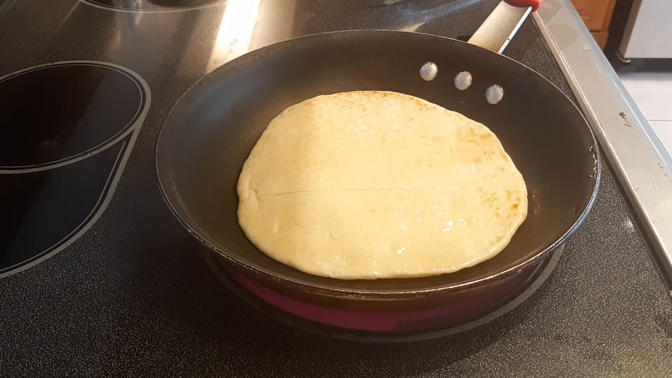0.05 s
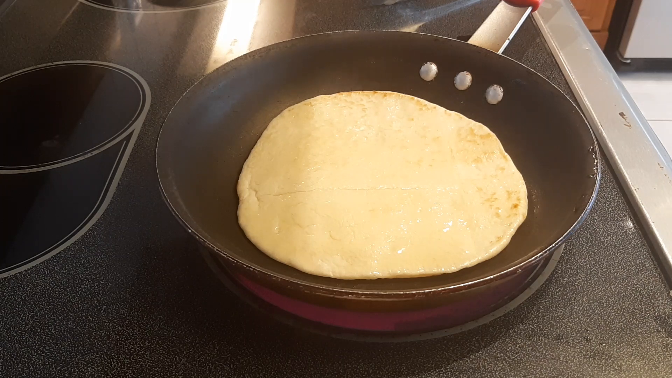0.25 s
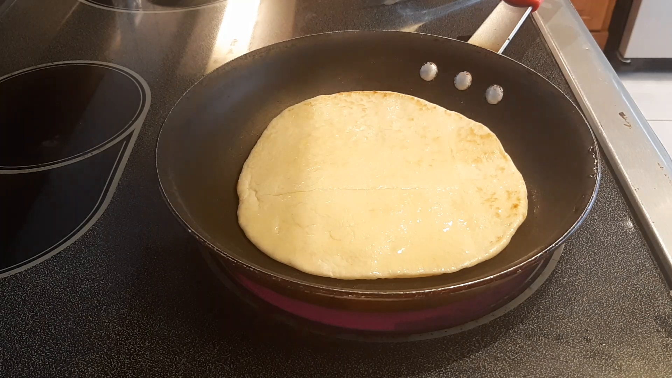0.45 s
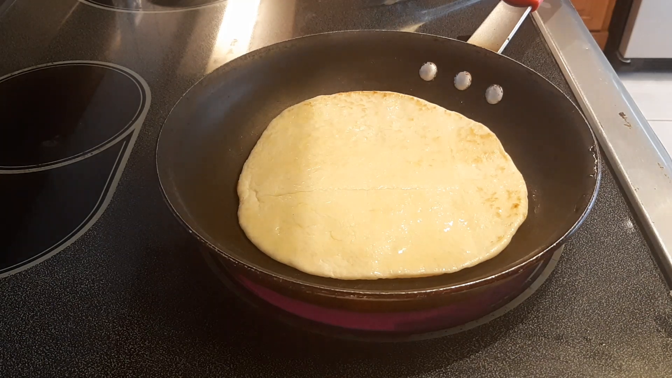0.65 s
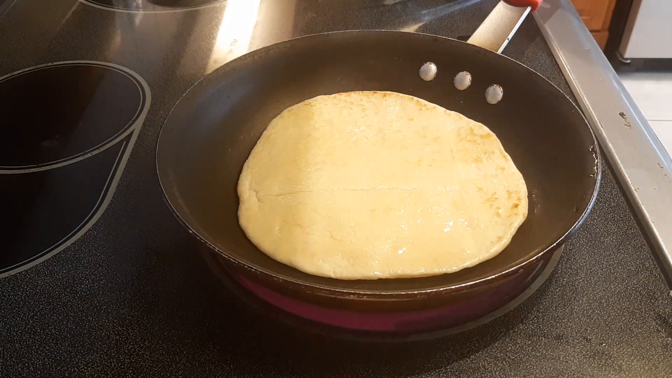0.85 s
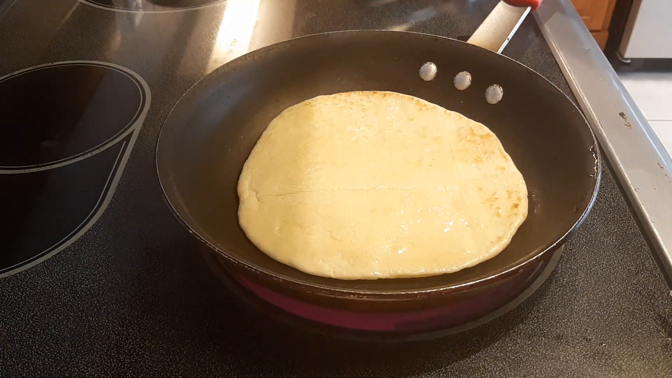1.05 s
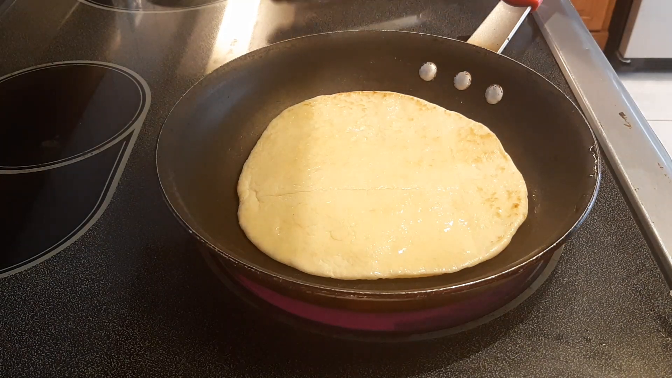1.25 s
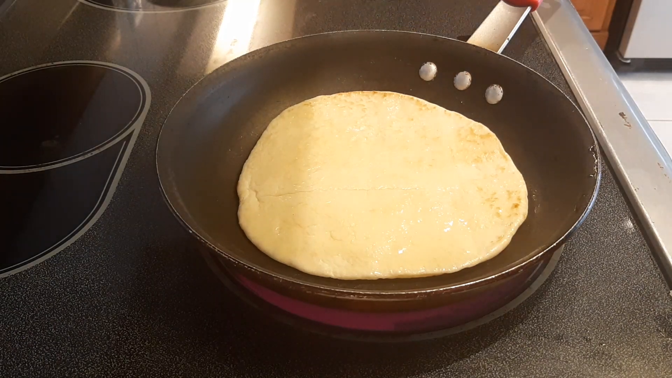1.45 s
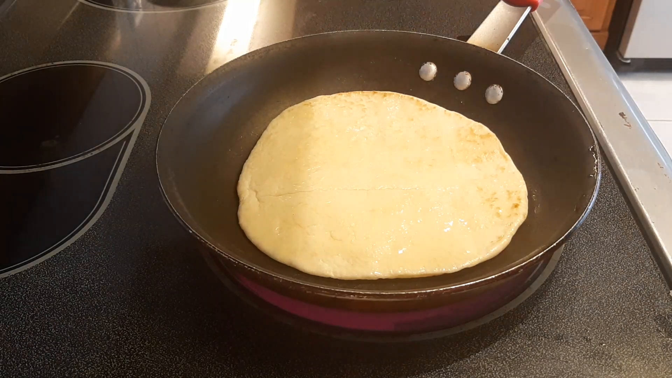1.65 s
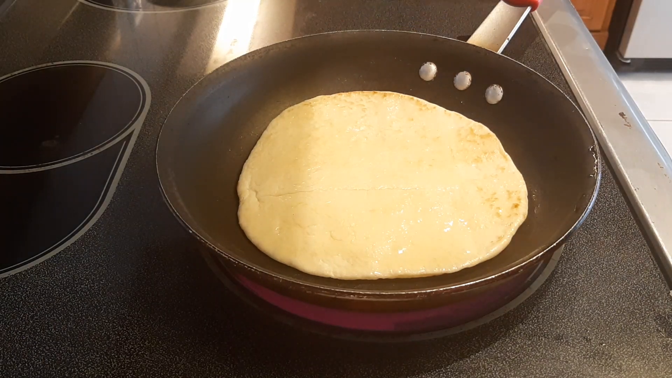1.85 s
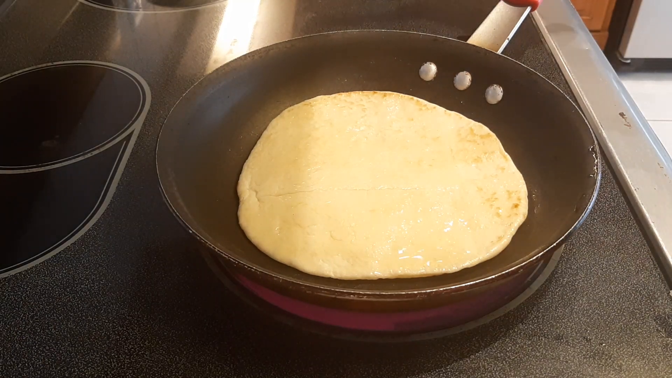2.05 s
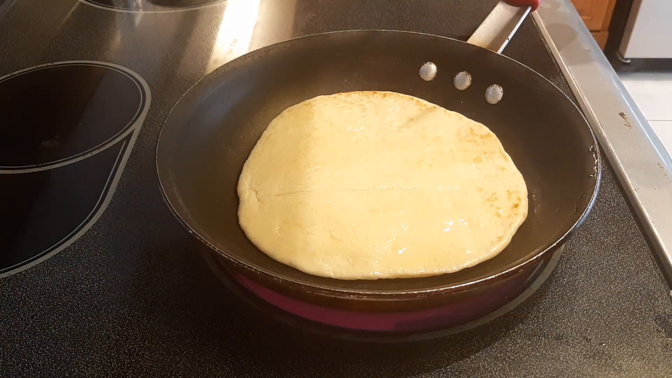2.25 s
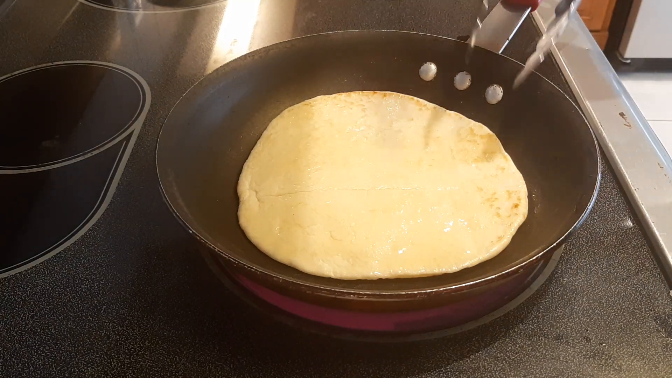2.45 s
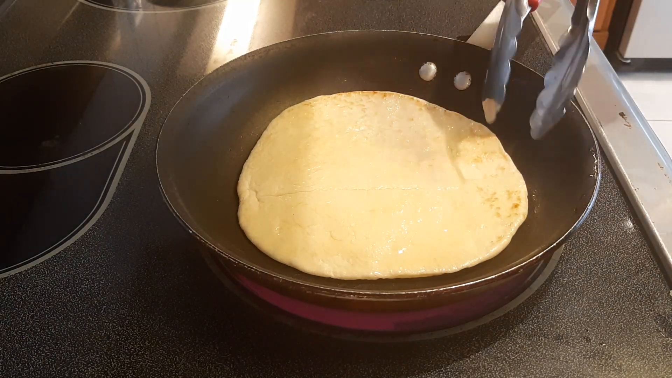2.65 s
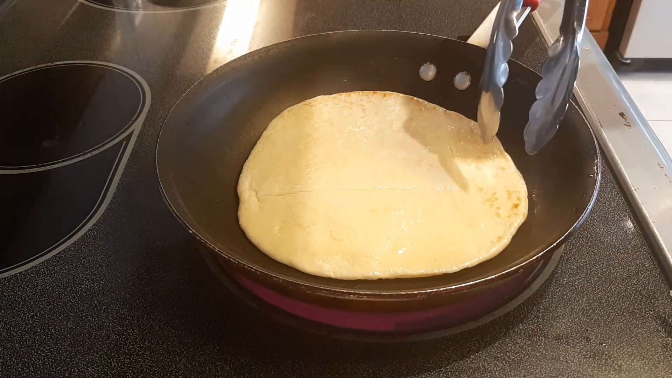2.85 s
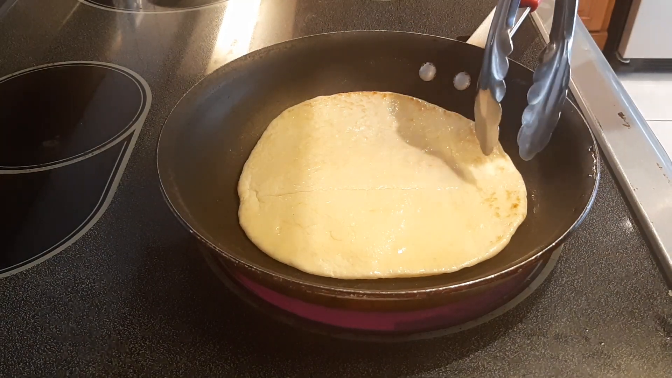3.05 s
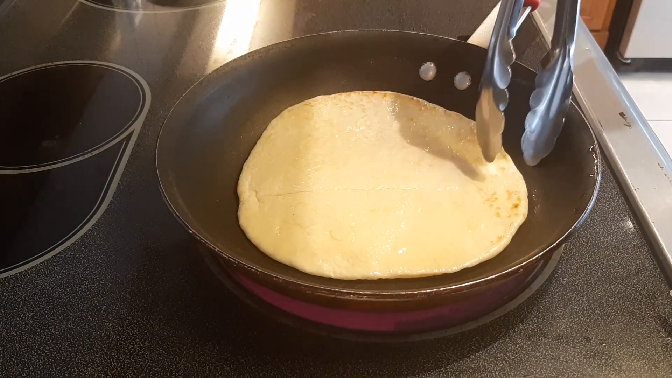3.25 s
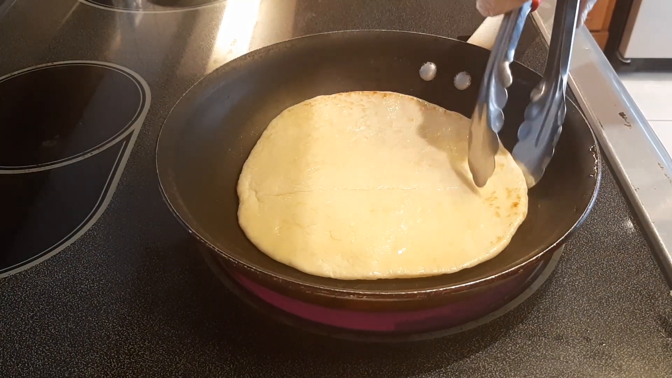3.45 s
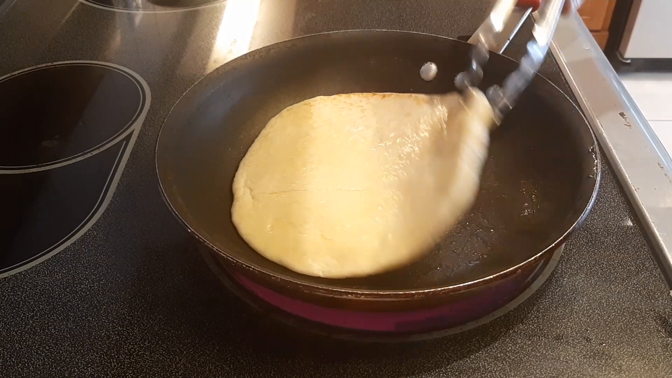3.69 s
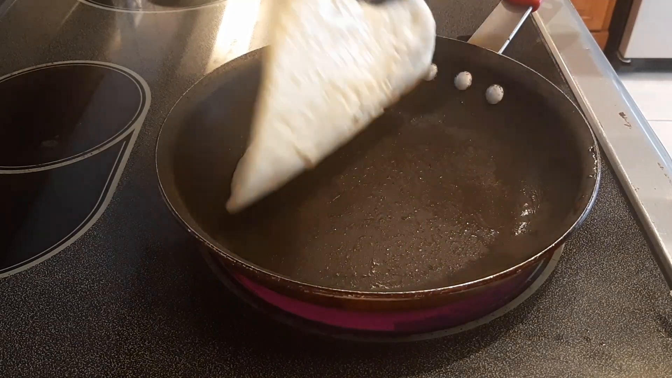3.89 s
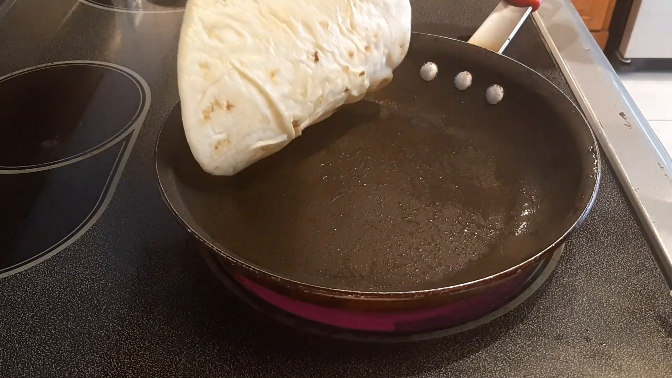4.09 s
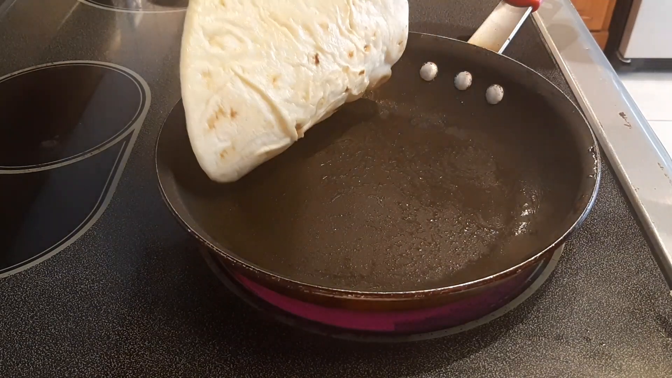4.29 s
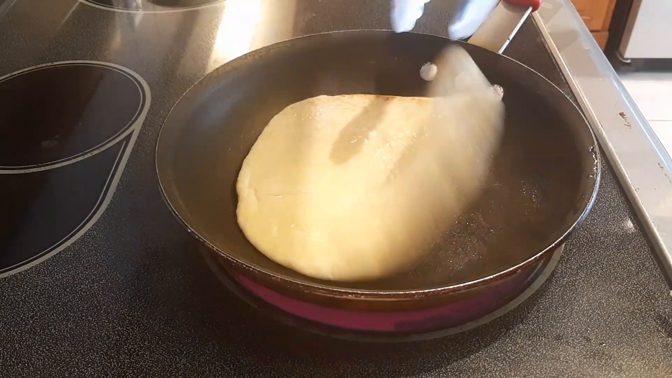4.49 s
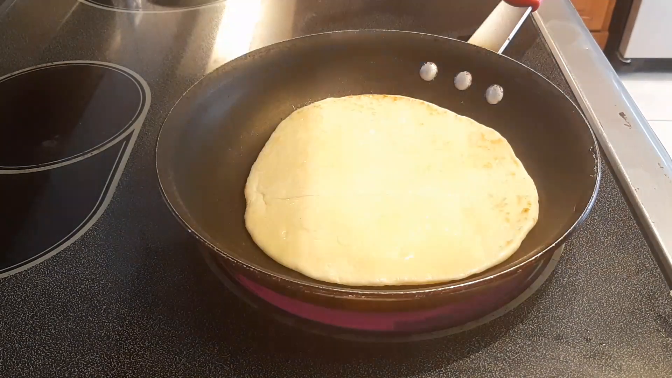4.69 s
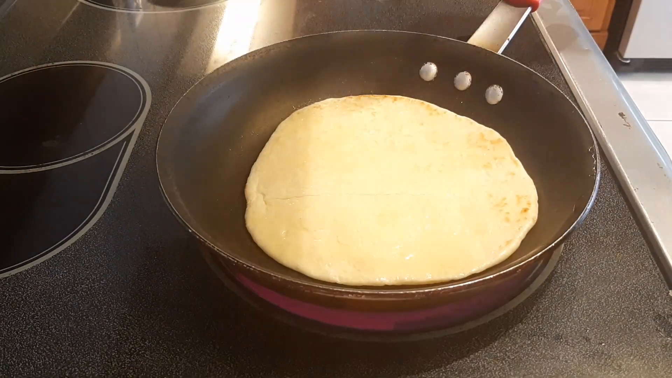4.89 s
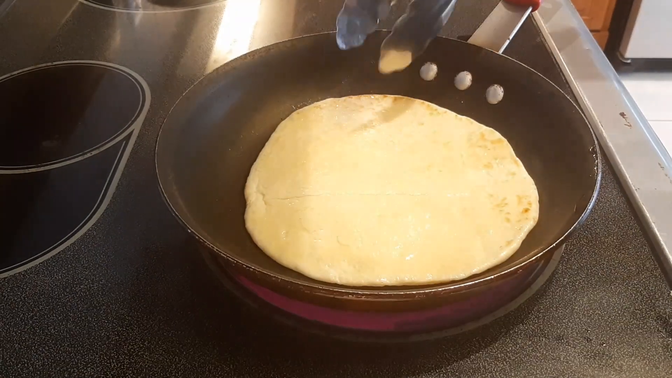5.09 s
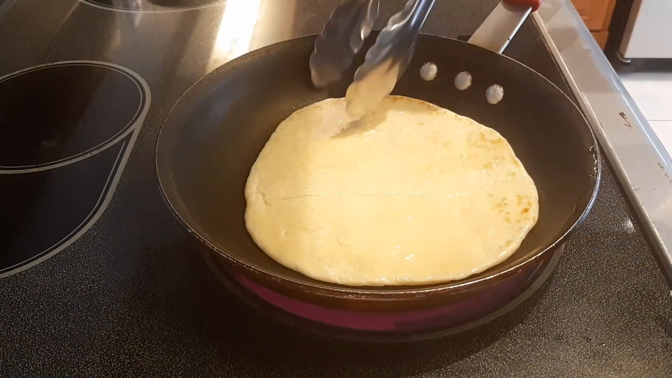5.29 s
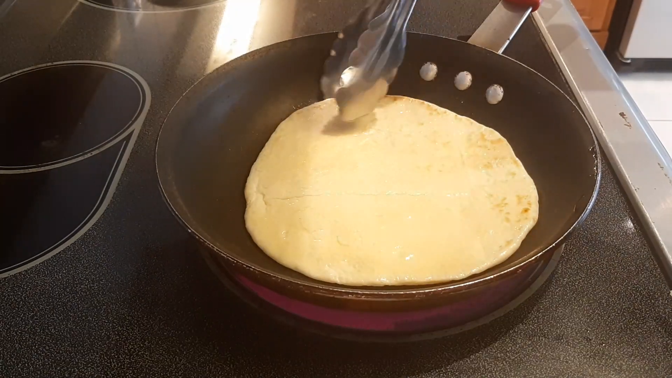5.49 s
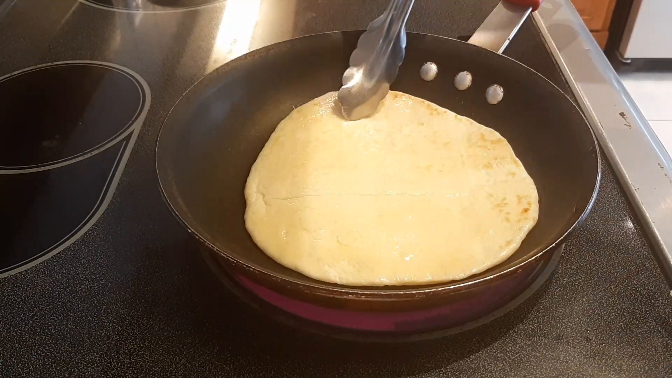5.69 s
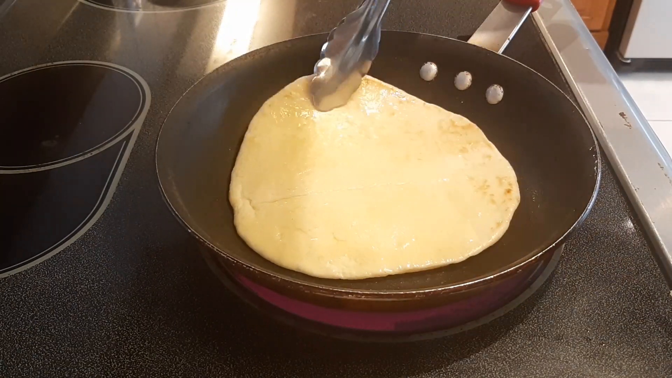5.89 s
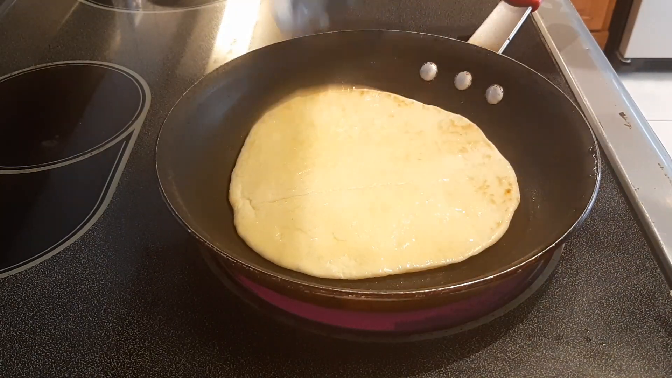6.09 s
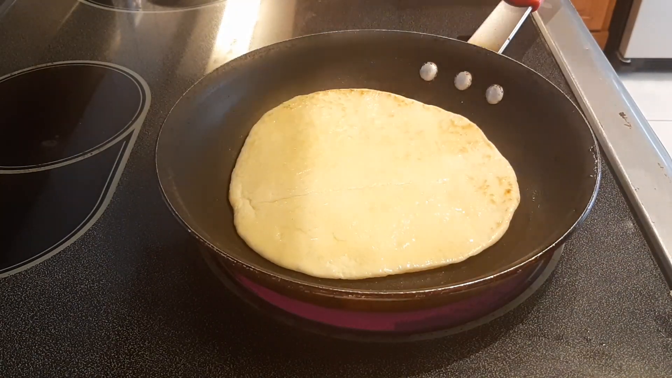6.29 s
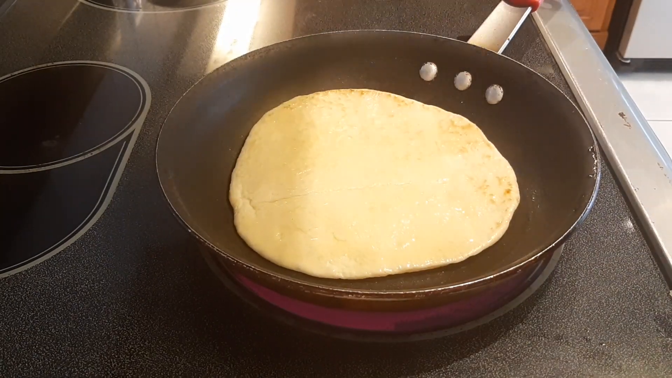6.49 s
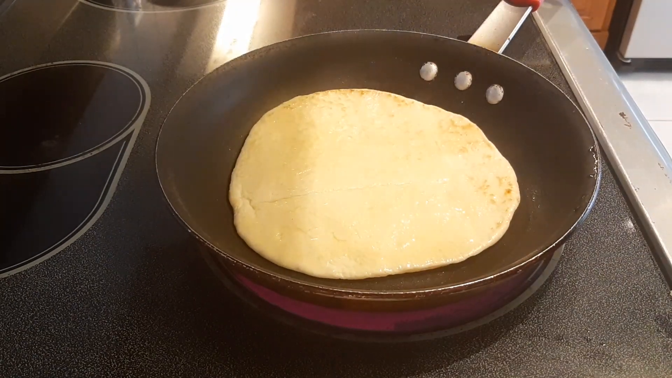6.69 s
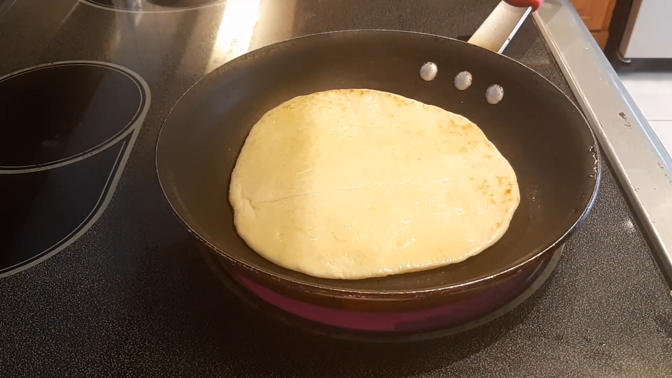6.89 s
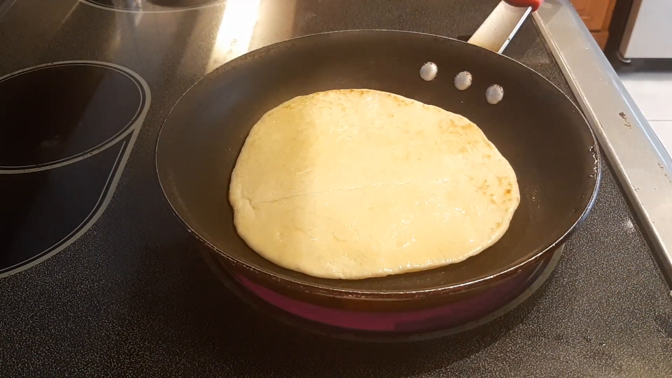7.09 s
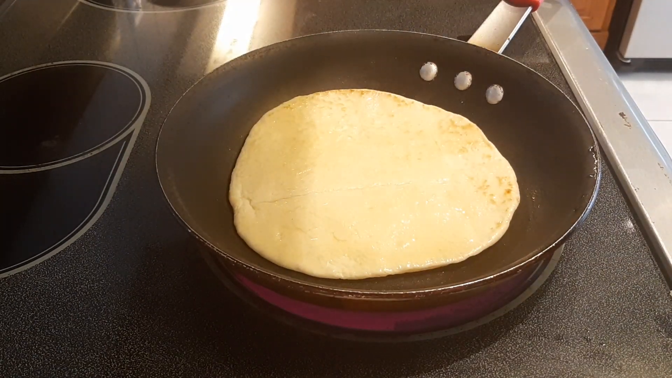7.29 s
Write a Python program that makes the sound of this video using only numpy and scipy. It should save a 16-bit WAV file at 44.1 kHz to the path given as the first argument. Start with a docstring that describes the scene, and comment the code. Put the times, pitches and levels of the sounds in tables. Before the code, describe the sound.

Soft cloth rustle, steel tongs clattering and clicking, a flat dough slap in a pan, then a hard metallic clack in a quiet kitchen.

```python
"""First heard are a low fridge hum and a faint sizzle, with the rub of hand and cloth swelling over them.
Steel kitchen tongs then knock and tick close to a phone; a flatbread slaps into a coated pan.
Hum is a sum of sines, sizzle and friction are filtered noise with uneven envelopes, and impacts
are short noise bursts exciting decaying modes; a small hard kitchen answers the impacts."""
import sys
import numpy as np
from scipy import signal
from scipy.fft import rfft, irfft
from scipy.io import wavfile
from scipy.ndimage import uniform_filter1d

SR = 44100
rng = np.random.default_rng(int(sys.argv[2]) if len(sys.argv) > 2 else 0)


def generate_wav(sig):
    """Save sig (samples, or channels by samples) to the path in sys.argv[1] as 16-bit PCM at SR."""
    pcm = np.round(np.clip(np.atleast_2d(sig).T, -1, 1) * 32767).astype(np.int16)
    wavfile.write(sys.argv[1], SR, pcm)


N = 323694
TIME = np.arange(N) / SR
BLOW = SR // 4  # samples in one impact


def undb(db):
    """Decibel definition: amplitude gain of a level in dB."""
    return 10 ** (np.asarray(db) / 20)


def level(x, db):
    """Root-mean-square scaling: brings a signal to an rms level in dB."""
    return x * undb(db) / np.sqrt(np.mean(x ** 2))


def peak1(x):
    """Peak normalisation: scales a signal to a largest magnitude of one."""
    return x / np.max(np.abs(x))


def sides(pan_db):
    """Level difference: shares left minus right dB equally between the two ports."""
    return np.array([[pan_db], [-pan_db]]) / 2


def read(table, size):
    """Logarithmic frequency scale: interpolates a (Hz, value) table at the bins of a transform."""
    hz, value = np.transpose(table)
    return np.interp(np.log(np.fft.rfftfreq(size, 1 / SR) + 1), np.log(hz), value)


def colour(x, table):
    """Minimum phase: a causal filter with the tabled gain, made by folding the cepstrum."""
    size = 2048
    cepstrum = irfft(read(table, size) * np.log(10) / 20)
    cepstrum[1:size // 2] *= 2
    cepstrum[size // 2 + 1:] = 0
    taps = irfft(np.exp(rfft(cepstrum)))
    taps = taps.reshape((1,) * (x.ndim - 1) + (-1,))
    return signal.oaconvolve(x, taps, axes=-1)[..., :x.shape[-1]]


def band(x, lo_hz, hi_hz):
    """Band limitation: a Butterworth band-pass."""
    return signal.sosfilt(signal.butter(2, [lo_hz, hi_hz], "band", fs=SR, output="sos"), x)


def highpass(x, order, hz):
    """Low-frequency roll-off: a Butterworth high-pass."""
    return signal.sosfilt(signal.butter(order, hz, "high", fs=SR, output="sos"), x)


def walk(rate):
    """Slow random fluctuation: levels held 1 / rate s, then smoothed twice; spread near 1."""
    hold = int(SR / rate)
    steps = np.repeat(rng.standard_normal(N // hold + 1), hold)
    return 1.3 * uniform_filter1d(uniform_filter1d(steps, hold), hold)[:N]


def grain(rough_db, rate):
    """Amplitude modulation: noise unrelated left and right under one shared uneven envelope."""
    return rng.standard_normal((2, N)) * undb(rough_db * walk(rate))


def late(lag_ms, size):
    """Propagation delay as linear phase: half a millisecond, plus the lag of left behind right."""
    delay_ms = (1 + np.array([[lag_ms], [-lag_ms]])) / 2
    return np.exp(-2j * np.pi * np.fft.rfftfreq(size, 1 / SR) * delay_ms / 1000)


def rattle(ms, rise_ms=0.9, lag_ms=0., shared=0.35):
    """Contact excitation: a decaying noise burst, partly alike at the two ports."""
    t = np.arange(BLOW) / SR
    rise = 1 - np.exp(-(t * 1000 / rise_ms) ** 2)
    shape = np.exp(-t / (ms / 1000)) * rise
    push = rfft(shape * rng.standard_normal((3, BLOW)))
    both = np.sqrt(shared) * push[0] + np.sqrt(1 - shared) * push[1:]
    return irfft(both * late(lag_ms, BLOW), BLOW)


def touch_at(lag_ms):
    """Impulse excitation: a single click reaching each port at its own moment."""
    return irfft(late(lag_ms, BLOW), BLOW)


def ring(push, modes):
    """Modal superposition: decaying sines whose phase and level vary with blow and port."""
    t = np.arange(BLOW) / SR
    hz, db, t60 = np.transpose(modes)[:, :, None]
    phase, uneven = rng.standard_normal((2, 2, len(modes), 1))
    swing = np.sin(2 * np.pi * hz * t + phase / 2) * np.exp(-np.log(1000) * t / t60)
    body = np.sum(undb(db + 2.0 * uneven) * swing, axis=1)
    return peak1(signal.fftconvolve(push, body, axes=1)[:, :BLOW])


def add(out, s, sound, db, pan_db):
    """Linear superposition: adds a sound at its time, level and side."""
    i = int(s * SR)
    out[:, i:i + sound.shape[1]] += (sound * undb(db + sides(pan_db)))[:, :N - i]


# air and fridge rumble: (frequency [Hz], relative gain [dB])
RUMBLE_SPECTRUM = [(18, -27.5), (30, -13.5), (70, -12), (118, -5.5), (141, -0.5), (183, -13.5), (239, -4.5),
                   (289, -16), (345, -10), (390, -8), (449, -16.5), (661, -23), (802, -30), (1680, -33.5),
                   (2000, -24), (2600, -63.5), (4400, -120)]
RUMBLE_DB, MAINS_HZ = -60, 60
# mains multiples 2, 4 and 5: (level [dB rms], left minus right [dB])
MAINS_LINES = [(-65.5, 3.5), (-63, -5.5), (-74, -1)]
# fridge motor: (frequency [Hz], level [dB rms], left minus right [dB])
MOTOR_LINE = (397, -73.5, -7)
# likeness of the ports in the rumble: (frequency [Hz], correlation [-], used within 0 to 1)
PORT_CORRELATION = [(60, 0.99), (130, 0.94), (290, 0.93), (640, -0.71), (1410, -2.2), (3100, -0.04),
                    (6820, -0.08), (15000, -0.03)]
# side of rumble and sizzle: (frequency [Hz], left minus right [dB])
STEADY_LEAN = [(60, 2), (110, 1.5), (200, -2), (380, -8.5), (700, 5.5), (1290, 4), (2380, 12.5),
               (4400, 5.5), (8120, 0.0), (15000, 4.0)]


def kitchen():
    """Spatial coherence: rumble alike at both ports in the bass, with gently wavering hum lines."""
    like = np.clip(read(PORT_CORRELATION, N), 0, 1)
    lean_db = read(STEADY_LEAN, N)
    mid, side = rfft(rng.standard_normal((2, N))) * undb(read(RUMBLE_SPECTRUM, N))
    mid, side = mid * np.sqrt(1 + like), side * np.sqrt(1 - like)
    rumble = irfft([(mid + side) * undb(lean_db / 2), (mid - side) * undb(-lean_db / 2)], N)
    lines = [(k * MAINS_HZ, *row) for k, row in zip((2, 4, 5), MAINS_LINES)] + [MOTOR_LINE]
    hum = np.zeros((2, N))
    for hz, db, pan_db in lines:
        gain = np.sqrt(2) * undb(db + 0.83 * walk(3) + sides(pan_db))
        hum += gain * np.sin(2 * np.pi * (hz * TIME + rng.random()))
    return level(rumble, RUMBLE_DB) + hum


# faint frying and capsule hiss: (frequency [Hz], relative gain [dB])
SIZZLE_SPECTRUM = [(880, -33), (1500, -14.5), (2100, -9), (2660, -9.5), (3080, 1), (3430, -6.5),
                   (3860, 1.5), (5090, 2), (5560, -3), (6260, 2.5), (7850, -8), (14900, 4), (15800, -10)]
SIZZLE_DB = -56.5  # rms before the dip
# the sizzle dips once the bread has settled: (time [s], level [dB])
SIZZLE_DIP = [(0, 0), (4.7, 0), (4.98, -2), (5.18, -3), (5.35, 0), (7.4, 0)]


def sizzle():
    """Incoherent noise: fine hiss, unrelated at the ports, with one shallow dip."""
    lean_db = read(STEADY_LEAN, N)
    spectrum_db = read(SIZZLE_SPECTRUM, N) + np.array([lean_db, -lean_db]) / 2
    fizz = irfft(rfft(grain(0.56, 500)) * undb(spectrum_db), N)
    return level(fizz, SIZZLE_DB) * undb(np.interp(TIME, *np.transpose(SIZZLE_DIP)))


# registers of friction, each: (frequency [Hz], relative gain [dB])
RUSTLE_SPECTRUM = [(1180, -39.5), (2000, -14.5), (2670, -8.5), (3410, -4.5), (3690, -5), (4420, -3),
                   (6280, -5.5), (7490, -16), (8500, -16.5), (11000, -51), (18700, -120)]
HISS_SPECTRUM = [(4120, -35), (7000, -2), (7520, -13), (10300, -2), (11700, -3), (14200, -0.5),
                 (15100, 5.5), (15800, -25.5)]
DRAG_SPECTRUM = [(47, -39.5), (80, -11), (237, -3), (522, -9), (557, -5), (709, -5.5), (774, -6), (864, -6),
                 (1100, -25.5), (1430, -58), (2420, -120)]
SCRAPE_SPECTRUM = [(530, -31), (900, -13), (1070, -14.5), (1130, -7), (1510, -3.5), (1650, -6.5),
                   (2600, -4.5), (3380, -37.5), (5720, -120)]
# strokes of hand, cloth, bread and steel: (full at [s], swell [s per 20 dB], hold [s], fade [s per 20 dB],
# rustle [dB], fine hiss [dB], low drag [dB], scrape [dB], singing steel [dB], left minus right [dB])
RUBS = [(.165, .2, .25, .12, -49, -49.5, -75, -61, -70, 2),
        (.445, .06, .01, .1, -43, -48, -56, -51, -70, .5),
        (.592, .08, .01, .3, -47, -45, -60, -58, -70, 1.5),
        (.7, .2, .13, .5, -52.5, -54, -60, -62, -70, .5), (1.0, .03, .04, .05, -50, -54, -46, -51, -50, -2),
        (1.05, .04, .085, .06, -43, -45, -39, -43, -48, -1),
        (1.175, .07, .055, .065, -32.5, -32, -43, -40, -39, 0),
        (1.29, .1, .03, .08, -45, -45.5, -52, -45, -50, 0),
        (1.36, .1, .08, .15, -55, -58, -59, -61, -70, 0),
        (1.62, .3, .2, .25, -51.5, -48, -73, -70, -70, 1.5),
        (1.95, .2, .5, .4, -59.5, -59, -70.5, -75, -80, 0), (2.6, .2, .75, .2, -67, -64, -79, -78, -80, 7),
        (3.43, .2, .3, .7, -62, -59.5, -61, -68, -80, 2),
        (3.92, .9, .08, .3, -58.5, -62, -66, -68, -80, -3),
        (4.53, .06, .04, .05, -50, -56, -56, -53, -70, -2), (4.68, .1, .1, .3, -55, -58, -72, -62, -75, -3),
        (5.23, .02, .03, .1, -66, -68, -59, -66, -80, 6), (5.28, .06, .04, .09, -66, -66, -52, -72, -66, 7),
        (5.325, .01, .035, .015, -75, -75, -70, -80, -61, 1),
        (5.47, .03, .1, .3, -58, -58, -62, -68, -75, -1),
        (5.645, .3, .1, .3, -53.5, -65, -59, -63, -75, -3),
        (5.83, .04, .065, .05, -50, -54, -51, -47.5, -75, 4),
        (6.2, .2, .12, .15, -58, -60, -77, -64, -80, 0)]
SING_HZ, SING_WIDTH_HZ = 4880, 200  # the arm of the tongs that sings when rubbed
SMOOTH_DB = -52  # a rustle above this level makes all registers judder
JUDDER, JUDDER_RATE = .11, 70  # dB of judder per dB above it; new values per second


def rubbing():
    """Power addition: overlapping strokes sum their energy in five registers of friction noise."""
    power, low = np.zeros((4, 2, N)), np.zeros(N)
    for s, swell_s, hold_s, fade_s, rustle_db, hiss_db, drag_db, scrape_db, steel_db, pan_db in RUBS:
        slope = np.minimum((TIME - s) / swell_s, (s + hold_s - TIME) / fade_s)
        shape = undb(20 * np.minimum(0, slope)) ** 2
        register_db = np.array([rustle_db, hiss_db, scrape_db, steel_db])[:, None, None]
        power += undb(register_db + sides(pan_db)) ** 2 * shape
        low += undb(drag_db) ** 2 * shape
    rustle = level(colour(grain(1.15, 300), RUSTLE_SPECTRUM), 0)
    hiss = level(colour(grain(0.72, 400), HISS_SPECTRUM), 0)
    scrape = level(colour(grain(0.6, 200), SCRAPE_SPECTRUM), 0)
    half_hz = SING_WIDTH_HZ / 2
    steel = level(band(grain(3.0, 120), SING_HZ - half_hz, SING_HZ + half_hz), 0)
    slips = grain(2.5, 90)
    slips = slips + 0.6 * slips.mean(axis=0)  # low sound is more alike at the ports
    drag = level(colour(slips, DRAG_SPECTRUM), 0)
    rustle_level_db = 10 * np.log10(power[0].mean(axis=0) + 1e-18)
    hard_db = np.maximum(rustle_level_db - SMOOTH_DB, 0)
    judder = undb(JUDDER * hard_db * walk(JUDDER_RATE))
    fine = np.sum(np.sqrt(power) * [rustle, hiss, scrape, steel], axis=0)
    return judder * (fine + np.sqrt(low) * drag)


# first contact below the treble: (frequency [Hz], relative gain [dB])
CRACK_SPECTRUM = [(590, -64), (1000, -24.5), (2220, -9), (3230, -10.5), (3700, -2), (4230, -12),
                  (4840, -7.5), (8500, -23), (11000, -63), (18700, -120)]
# modes of the steel arms: (frequency [Hz], level [dB], t60 [s])
TONG_MODES = [(1380, -16, .07), (1995, -11, .04), (2312, -5, .05), (2805, -5, .045), (3235, -16, .05),
              (3720, 3, .034), (4820, 2, .02), (5740, -20, .08), (6580, -17, .05), (7600, -18, .04),
              (8315, -15, .05), (9845, -16, .07), (10030, -11, .04), (11520, -16, .08), (12720, -12, .05),
              (13965, -11, .035), (14540, -12, .03)]
# modes of pan and worktop: (frequency [Hz], level [dB], t60 [s])
PAN_MODES = [(127, -6, 0.077), (305.3, -6.5, 0.23), (364, -10.5, 0.14), (602, -3.5, .07),
             (644.3, -0.5, 0.091), (732, -4, 0.065), (850, -3.5, 0.079), (960, -5, .06),
             (1100, -5.5, 0.045), (1550, -1, 0.067), (1950, 1, 0.071), (2940, -1.5, .045)]
# tongs on pan or worktop: (time [s], crack [dB], steel ring [dB], thud [dB], pan ring [dB],
# left minus right [dB], thud pitch [Hz], treble relative to crack [dB], rattle decay [ms])
TONG_KNOCKS = [(0.4405, -42, -48, -47, -60, 6, 1190, -9, 16), (.9988, -37, -42, -33, -41, 2, 700, -5, 3.2),
               (1.0191, -23.5, -33, -24.5, -19.5, 4, 207, 1.5, 3.7),
               (1.033, -26.5, -28, -27.5, -29.5, 7, 187, 1, 2),
               (1.0814, -31, -28, -33, -35, -5, 716, -6, 12), (1.1636, -18, -24, -20, -19, 5, 1170, 1, 3.9),
               (1.2209, -30, -36, -30, -38, 4, 1500, -5, 3.5),
               (5.9955, -5, -1.5, -31, -32, 2, 310, -0.5, 4.25),
               (6.013, -44, -43, -33, -31, -3, 320, -4, 14), (6.1294, -30, -42, -37, -47, 0, 780, -12, 2.8)]
KNOCK_LAG_MS = -.025  # left before right


def knocks():
    """Impact and resonance: each blow cracks, rings the steel arms and thuds in what lies under them."""
    out = np.zeros((2, N))
    for s, crack_db, steel_db, thud_db, ring_db, pan_db, hz, treble_db, ms in TONG_KNOCKS:
        push, touch = rattle(ms, lag_ms=KNOCK_LAG_MS), touch_at(KNOCK_LAG_MS)
        treble = undb(treble_db) * peak1(band(push, 8800, 15000))
        crack = peak1(colour(push, CRACK_SPECTRUM)) + treble
        steel = band(ring(touch, TONG_MODES), 1100, 18000)
        thud = peak1(band(rattle(1.8 * ms, rise_ms=1.6, shared=.95), 0.69 * hz, 1.37 * hz))
        pan = ring(band(touch, 210, 1630), PAN_MODES)
        contact = undb(crack_db) * crack + undb(steel_db) * steel
        beneath = undb(thud_db) * thud + undb(ring_db) * pan
        add(out, s, contact + beneath, 0, pan_db)
    return out


# decay of the kitchen: (frequency [Hz], t60 [s])
ROOM_DECAY = [(200, 0.58), (1000, 0.57), (4000, 0.43), (9000, 0.33), (15000, 0.11)]
ROOM_DB = -9


def room(x):
    """Diffuse reverberation: a noise tail, shorter in the treble and different at each port."""
    t = np.arange(int(.7 * SR)) / SR
    hz, t60 = np.transpose(ROOM_DECAY)
    tail = np.zeros((2, len(t)))
    for f in 125 * 2. ** np.arange(8):  # octave bands
        octave = band(rng.standard_normal((2, len(t))), f / np.sqrt(2), min(f * np.sqrt(2), .45 * SR))
        tail += octave * np.exp(-np.log(1000) * t / np.interp(np.log(f), np.log(hz), t60))
    tail *= 1 - np.exp(-(t / .003) ** 2)  # the first walls answer after a few ms
    tail /= np.sqrt(np.sum(tail ** 2) / 2)
    return undb(ROOM_DB) * signal.oaconvolve(x, tail, axes=1)[:, :N]


# scalloped tip: (share of the tick's pitch [-], level [dB])
TIP_MODES = [(.94, -7), (1, 0), (1.08, -8), (1.145, -9)]
# tips and hinge ticking: (time [s], ring [dB], pitch [Hz], noise [dB], snap [dB], snap pitch [Hz],
# left minus right [dB], rattle decay [ms], rise [ms])
TIP_TICKS = [(1.1636, -21, 4700, -30, -30, 12700, 3, 3.5, .3),
             (1.184, -23, 4820, -35, -28, 12700, -2, 4, 1), (1.5495, -31, 4200, -26, -36, 12100, -8, 8, .2),
             (1.5563, -24, 4800, -19, -16, 14000, 0, 4, .22),
             (1.5624, -27, 5230, -20, -21, 12200, 3, 4.8, .44),
             (1.6183, -24, 4150, -13.5, -10, 12700, -2.5, 5.6, 2.9),
             (1.6188, -29, 2790, -31, -36, 12000, 5, 4, 1.5),
             (1.637, -36, 4840, -25, -17, 14900, 4, 6.5, .33),
             (1.642, -26.5, 5560, -23.5, -20, 14900, 3, 13, .34),
             (1.8022, -27, 3950, -22, -21, 14500, -2, 4.1, .93),
             (2.4495, -48, 5400, -43, -43, 15200, -5, 7.2, .32),
             (2.5406, -42, 6300, -45, -35, 10200, 2.5, 2.5, .18),
             (2.759, -35.5, 5360, -33, -22, 11700, 2, 3.7, .12),
             (2.9257, -48, 5730, -47, -52, 14700, -4, 3.3, .15),
             (3.035, -31.5, 5330, -36, -24, 12400, 7, 3.7, .12),
             (3.202, -32, 5400, -34, -22.5, 12500, .5, 4.7, .2),
             (3.4617, -46, 6300, -43, -20, 14500, 5, 2.3, .1),
             (4.4942, -42, 4830, -44, -50, 13100, 0, 4.1, .15),
             (5.218, -47, 4700, -47, -56, 13300, 4, 3, .15),
             (5.3813, -39, 5050, -46, -32, 12700, 2, 3.4, .15)]
TICK_LAG_MS = .035  # left after right


def ticks():
    """Light-edge resonance: thin steel gives a short ring, a noise burst and a bright snap."""
    out = np.zeros((2, N))
    for s, ring_db, hz, noise_db, snap_db, snap_hz, pan_db, ms, rise_ms in TIP_TICKS:
        push = rattle(ms, rise_ms, TICK_LAG_MS)
        modes = [(share * hz, mode_db, .016) for share, mode_db in TIP_MODES]  # t60 16 ms
        edge = band(ring(push, modes), hz / 2, 9000)
        noise = peak1(band(band(push, .72 * hz, 7000), .6 * hz, 7300))
        snap = peak1(band(push, 0.91 * snap_hz, 1.11 * snap_hz))
        sound = undb(ring_db) * edge + undb(noise_db) * noise + undb(snap_db) * snap
        add(out, s, sound, 0, pan_db)
    return out


# clap of dough on pan: (frequency [Hz], relative gain [dB])
SLAP_SPECTRUM = [(53, -45), (90, -11.5), (758, -6.5), (900, -0.5), (1320, -7.5), (1960, -2.5), (2120, -11),
                 (2980, -1), (3410, -15), (4280, -5), (6400, -8), (7250, -23), (8500, -25), (11000, -47.5),
                 (18700, -120)]
# the bread falls flat into the pan, edge first: (time [s], level [dB], left minus right [dB], decay [ms], rise [ms],
# treble relative to clap [dB], pan ring relative to clap [dB])
BREAD_SLAPS = [(4.562, -11, 1.5, 5.9, 2.5, -9, -11.5), (4.570, -12.5, 2, 6.2, 0.21, -3.5, -9),
               (4.578, -25, 3.5, 4.9, 1.7, -17, -10)]


def slaps():
    """Damped impact: soft dough claps the air out from under it and sets the pan sounding briefly."""
    out = np.zeros((2, N))
    for s, db, pan_db, ms, rise_ms, treble_db, ring_db in BREAD_SLAPS:
        push = rattle(ms, rise_ms, lag_ms=-0.081)
        treble = undb(treble_db) * peak1(band(push, 9300, 16500))
        clap = peak1(colour(push, SLAP_SPECTRUM)) + treble
        pan = undb(ring_db) * ring(touch_at(-0.0014), PAN_MODES)
        add(out, s, clap + pan, db, pan_db)
    return out


def ports(x):
    """Long-wavelength limit: waves much longer than the phone reach both ports alike."""
    mid, side = (x[0] + x[1]) / 2, (x[0] - x[1]) / 2
    side = highpass(side, 1, 260)
    return np.array([mid + side, mid - side])


def scene():
    """Direct and reverberant sound: impacts with their room, over dry friction and background."""
    near, loud = ticks(), knocks() + slaps()
    # small ticks close to the phone stand further above the room than the blows
    hits = near + loud + room(loud + undb(-1.5) * near)
    return ports(hits + rubbing()) + sizzle() + kitchen()


EDGE_HZ, TOP_HZ = 15900, 16600


def record(dry):
    """Gain control and band limits: level backs off after a very loud peak, then creeps back."""
    peak_db = 20 * np.log10(np.abs(dry).max(axis=0) + 1e-9)
    over_db = np.maximum(peak_db + 8, 0)  # above -8 dB of full scale
    held_db = np.maximum(np.maximum.accumulate(over_db + 0.14 * TIME) - 0.32 * TIME, 0)
    held_db = held_db * (np.maximum.accumulate(over_db) > 0)
    cut_db = uniform_filter1d(np.roll(0.21 * held_db, 441), 441)  # 10 ms late, smoothed over 10 ms
    wet = highpass(dry * undb(-cut_db), 2, 48)  # small capsule, little deep bass
    # the sound thins sharply above 15.9 kHz and ends at 16.6 kHz
    wet = signal.sosfilt(signal.ellip(8, .2, 28, EDGE_HZ, fs=SR, output="sos"), wet)
    wet = signal.sosfilt(signal.ellip(10, .2, 70, TOP_HZ, fs=SR, output="sos"), wet)
    return np.clip(wet, -1, 1)


dry = scene()
out = record(dry)
generate_wav(out)
```